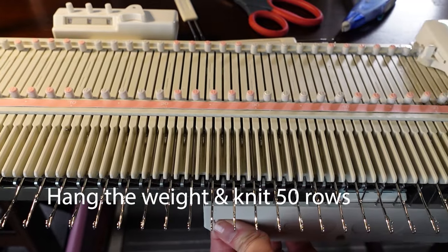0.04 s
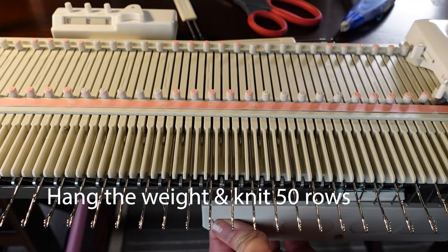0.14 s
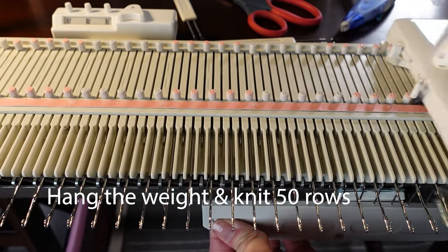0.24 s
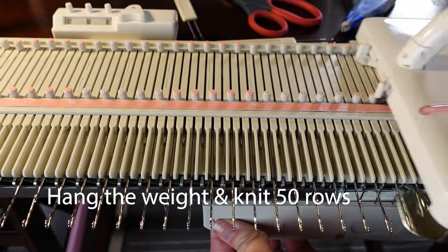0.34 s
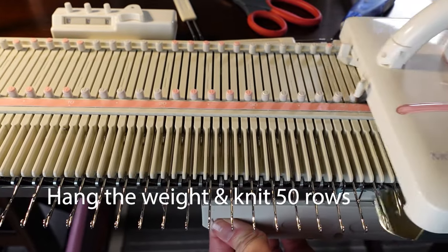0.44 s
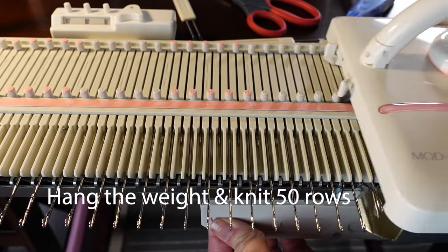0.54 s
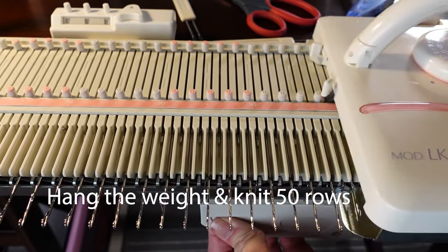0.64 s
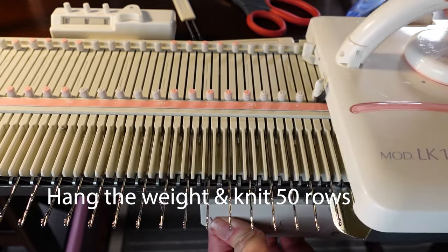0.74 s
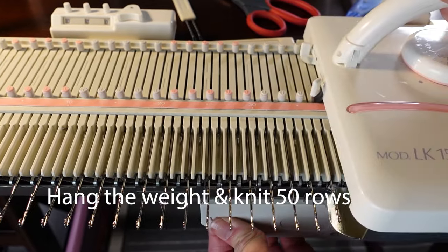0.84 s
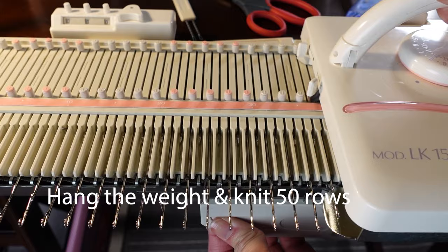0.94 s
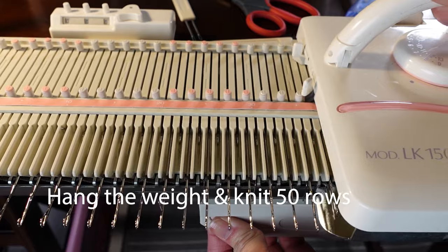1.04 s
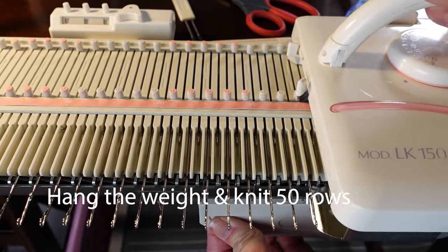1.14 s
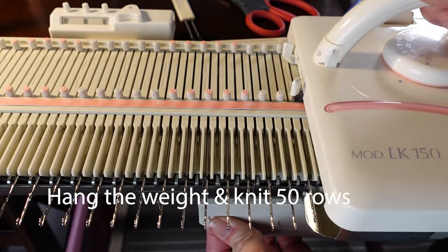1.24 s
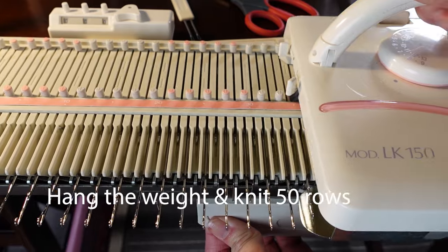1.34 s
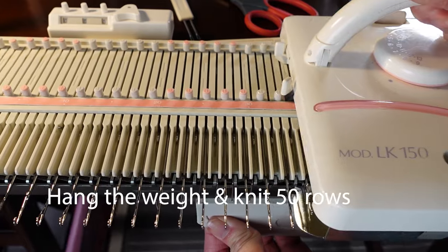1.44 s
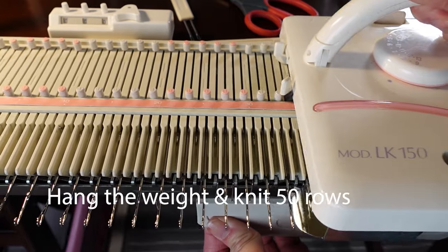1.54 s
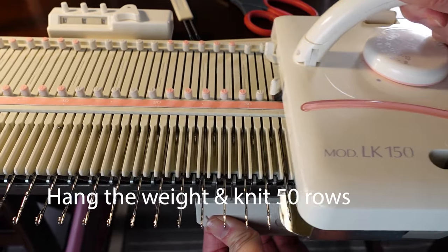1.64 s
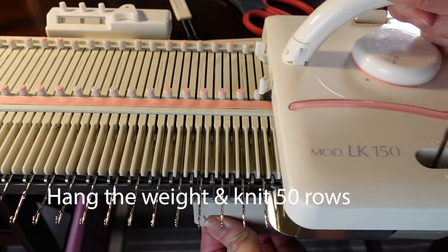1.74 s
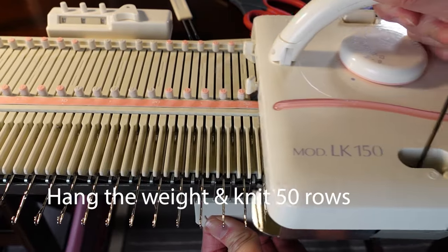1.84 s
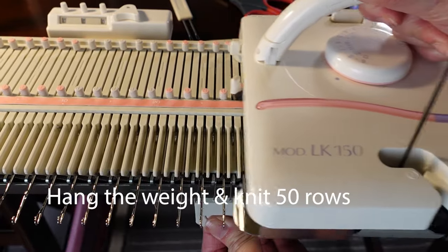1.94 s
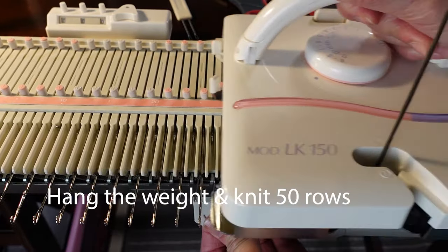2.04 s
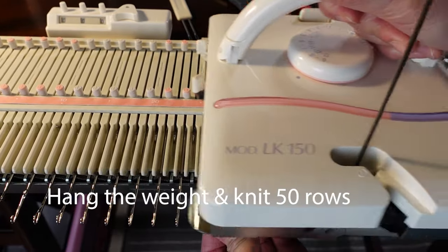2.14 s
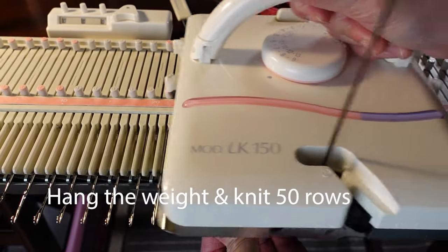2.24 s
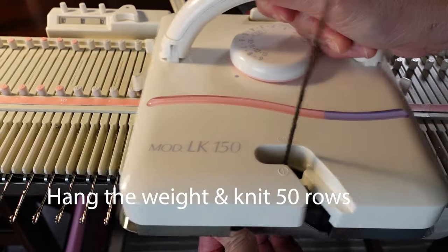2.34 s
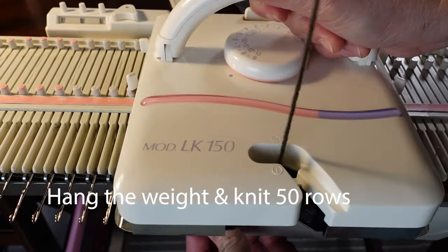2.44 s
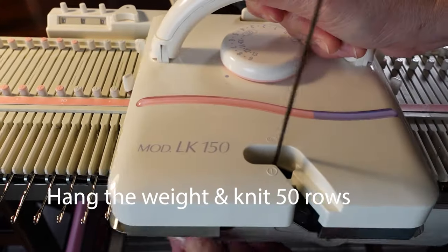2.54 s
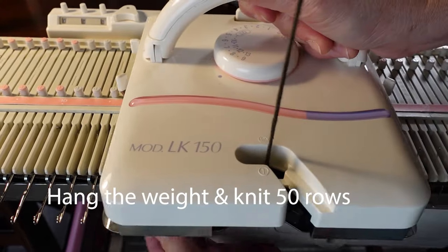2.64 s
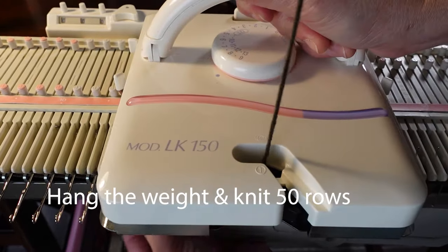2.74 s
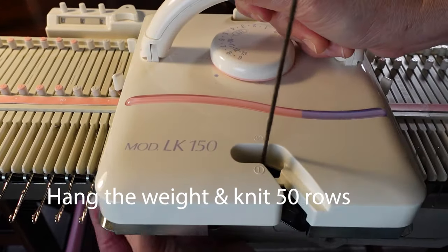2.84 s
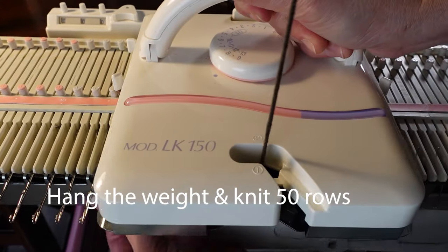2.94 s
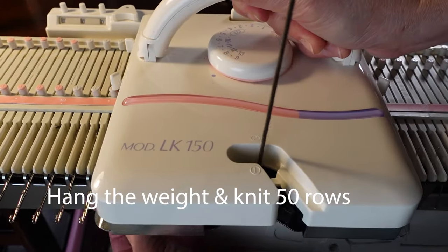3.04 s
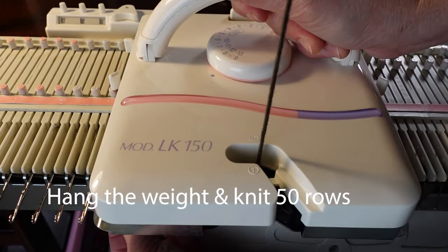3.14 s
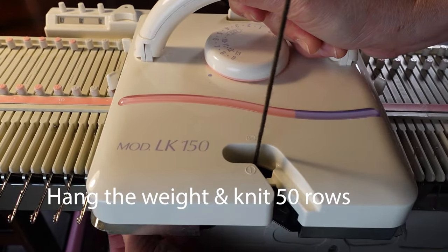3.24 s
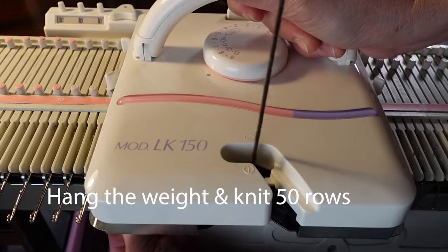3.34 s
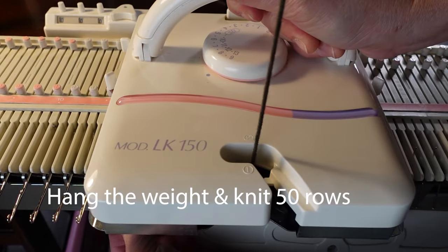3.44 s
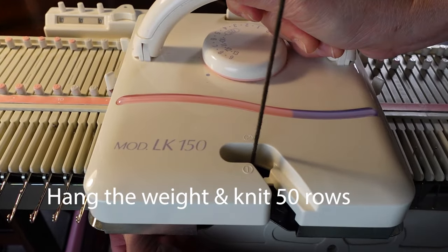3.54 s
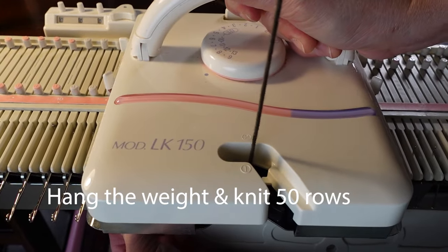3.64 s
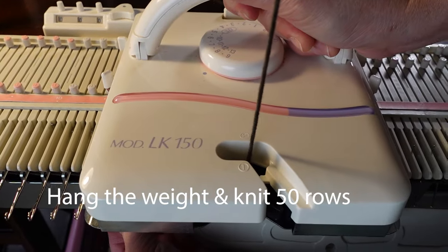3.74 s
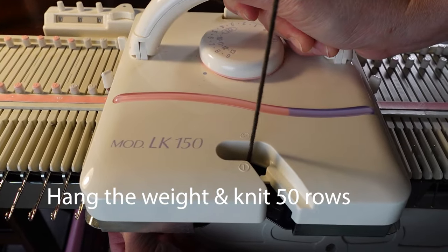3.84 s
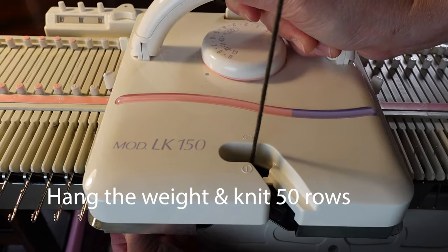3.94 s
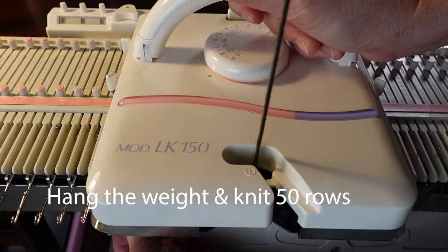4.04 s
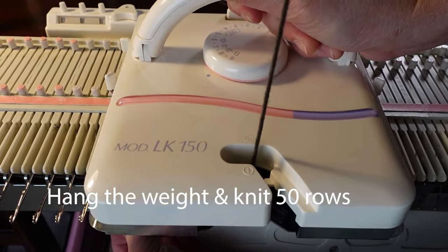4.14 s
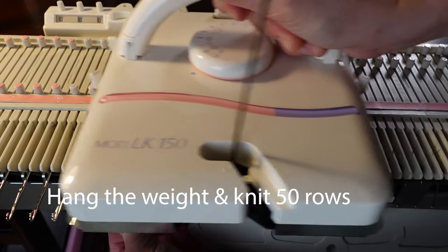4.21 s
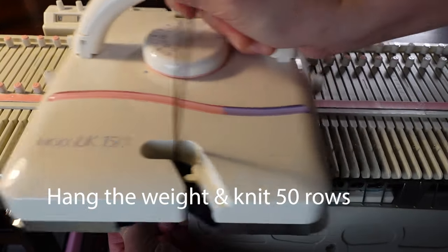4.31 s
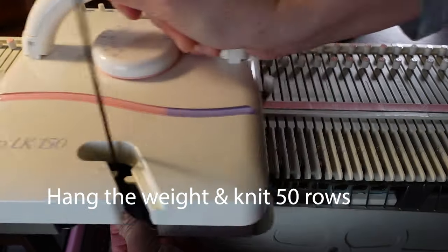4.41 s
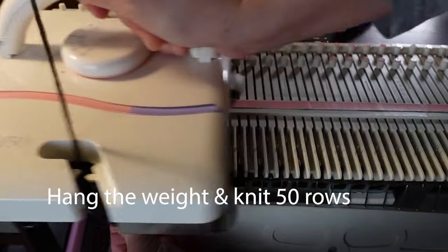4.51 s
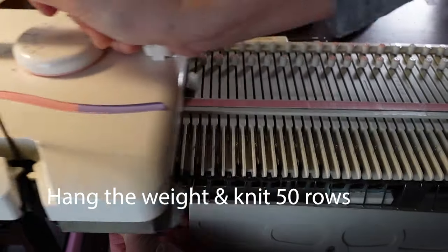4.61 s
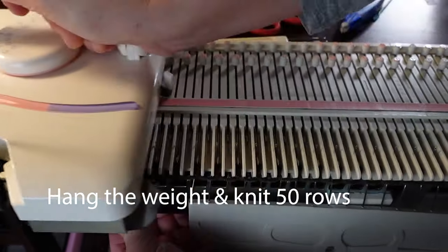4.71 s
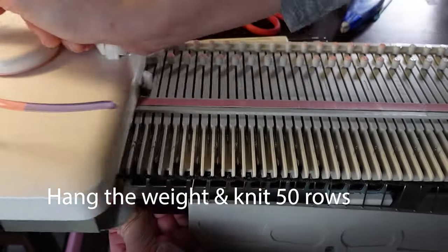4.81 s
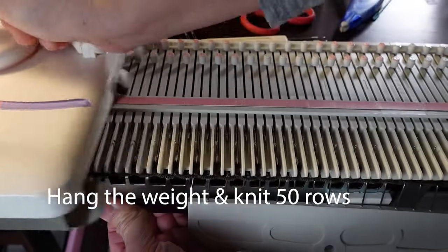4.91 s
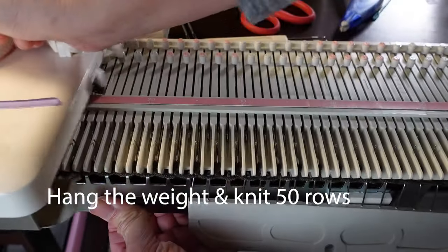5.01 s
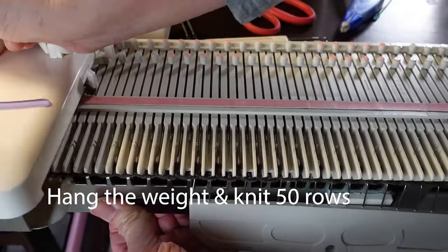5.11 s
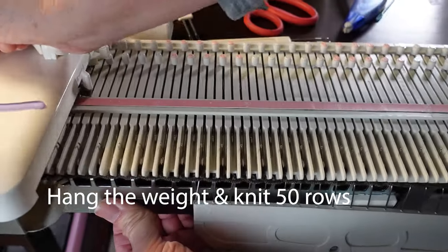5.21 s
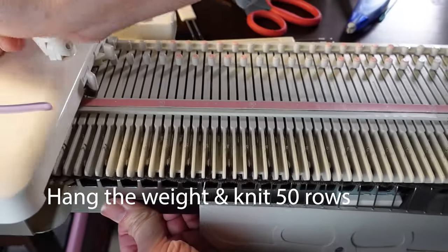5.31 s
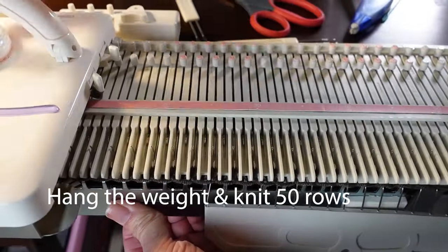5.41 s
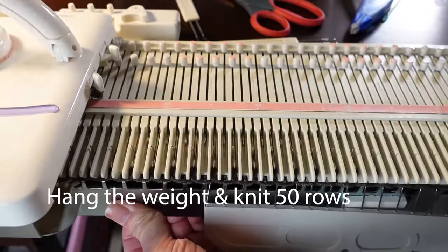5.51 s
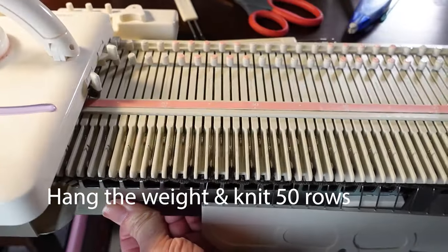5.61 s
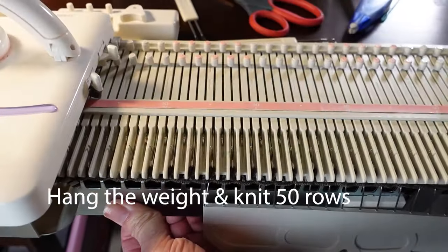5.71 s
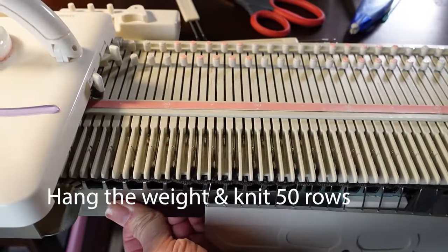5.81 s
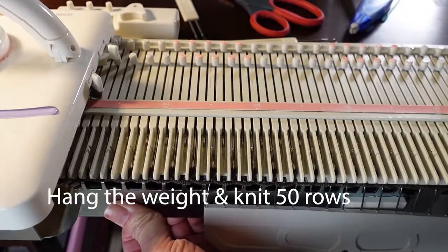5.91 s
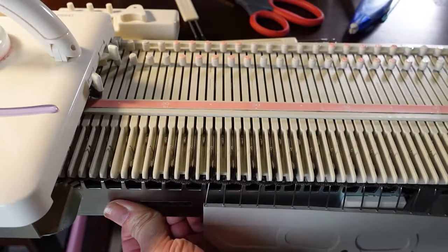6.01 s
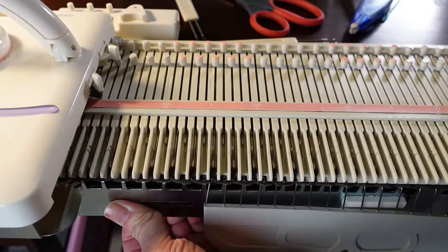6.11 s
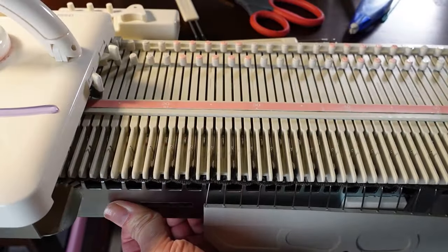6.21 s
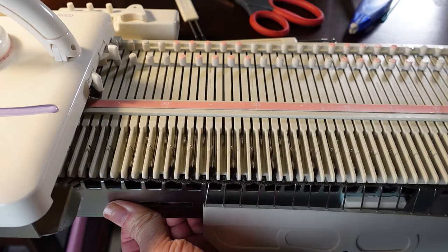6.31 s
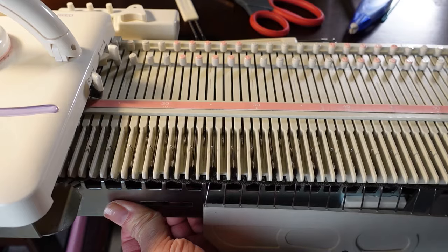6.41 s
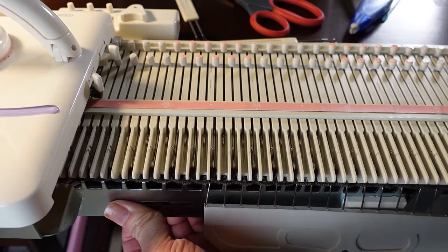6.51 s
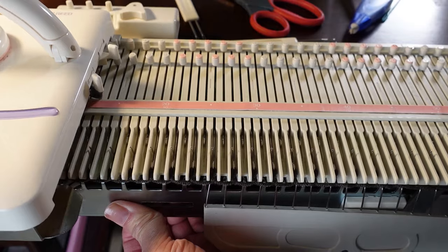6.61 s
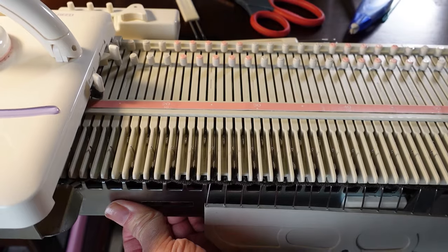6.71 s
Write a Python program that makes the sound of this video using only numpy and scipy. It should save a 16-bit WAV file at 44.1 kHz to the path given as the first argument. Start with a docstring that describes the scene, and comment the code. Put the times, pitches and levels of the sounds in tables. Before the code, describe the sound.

A plastic carriage rattles and clacks in jerky pushes along a needle bed, pauses with faint clicks, rattles hard again, then fingers clink softly on metal.

```python
"""A plastic knitting carriage is pushed in jerks from right to left along the needle bed, close to a phone.
Needle butts clack against its cams: noise bursts that ring shell, rail and table top; steel latches tick.
Runners scrape and rattle: noise shaken by dense tiny knocks; the bed rumbles under each jerk.
At the end a hand clinks and rustles on the steel comb below; a small quiet room adds its tail and faint hiss."""
import sys
import numpy as np
from scipy import signal
from scipy.fft import rfft, irfft
from scipy.io import wavfile

SR = 44100
rng = np.random.default_rng(int(sys.argv[2]) if len(sys.argv) > 2 else 0)


def transcribe(u):
    """Save the signal u as a 16-bit wav file named by the first command-line argument.

    u: samples, shape (n,) or (channels, n), limited to [-1, 1]; the rate is SR.
    q: integer samples, one column per channel.
    """
    v = np.clip(np.atleast_2d(u).T, -1, 1)
    q = np.round(v * 32767).astype(np.int16)
    wavfile.write(sys.argv[1], SR, q)


N = 298116
LEFT_RIGHT = np.array([[1], [-1]])  # sign of the side signal in each channel

# modes of plastic shell and bed: f/Hz, relative level/dB, t60/s
SHELL_MODES = [(691.5, -22.5, 0.076), (1189, -17, 0.019), (1454, -22.5, 0.061), (1630, -27.5, 0.045),
               (2330, -34.5, 0.035), (3100, -15, 0.0094)]


def undb(db):
    """Amplitude ratio of a level in dB."""
    return 10 ** (np.asarray(db) / 20)


def unit(x):
    """Scale x to rms 1."""
    return x / np.sqrt(np.mean(x ** 2))


def pole_radius(t60_s):
    """Factor per sample of a decay of 60 dB in t60_s."""
    return 1000 ** (-1 / (t60_s * SR))


def colour(x, points):
    """Shape the spectrum of x by (f/Hz, level/dB) points, log-f interpolation; rms 1."""
    hz, db = np.transpose(points)
    f_hz = np.fft.rfftfreq(x.shape[-1], 1 / SR) + 1  # +1 avoids log(0)
    gain_db = np.interp(np.log(f_hz), np.log(hz), db, left=-90, right=-90)
    return unit(irfft(rfft(x) * undb(gain_db), x.shape[-1]))


def band(x, hz, q):
    """Two-pole band-pass, gain 1 at the centre."""
    w = 2 * np.pi * min(hz, .45 * SR) / SR
    a = np.sin(w) / (2 * q)
    return signal.lfilter([a, 0, -a], [1 + a, -2 * np.cos(w), 1 - a], x)


def ring(x, modes):
    """Modes of a struck body: two-pole resonators, each of equal energy times its level."""
    out = 0
    for hz, db, t60_s in modes:
        r = pole_radius(t60_s)
        w = 2 * np.pi * hz / SR
        mode = signal.lfilter([1, 0, -1], [1, -2 * r * np.cos(w), r * r], x) / (2 * np.sin(w))
        out = out + undb(db) * np.sqrt(1 - r * r) * mode
    return out


def blows(table, t60_s, rise_s, q, crack_hz, crack_db, spread_db, ring_db, ring_t60_s):
    """A noise burst a row: body around its centre, ring on that pitch, shorter crack; stereo offset varies."""
    length = 4096
    t = np.arange(length) / SR
    shape = 1000 ** (-t / t60_s) * (1 - np.exp(-t / rise_s))
    chance = rng.standard_normal((len(table), length + 1))
    out = np.zeros((2, N + length))
    for (s, db, hz, *_), bright_db, c in zip(table, np.broadcast_to(crack_db, len(table)), chance):
        offset, noise = c[0], c[1:]
        body = band(band(band(noise * shape, hz, q), hz, q), hz, q)
        crack = band(band(noise[::-1] * shape ** 2, crack_hz, 0.52), crack_hz, 0.52)
        tone = ring(noise * shape ** 2, [(hz, 0, ring_t60_s)])
        burst = body / np.abs(body).max()
        burst = burst + undb(ring_db) * tone / np.abs(tone).max()
        burst = burst + undb(bright_db) * crack / np.abs(crack).max()
        # gradient term: a fraction of a sample early in one channel, late in the other
        pair = burst + 0.14 * offset * np.gradient(burst) * LEFT_RIGHT
        i = int(s * SR)
        out[:, i:i + length] += pair * undb(db + spread_db * offset * LEFT_RIGHT / 2)
    return out[:, :N]


def rattle(per_s, scatter_db, t60_s, count=1):
    """Envelopes of dense uneven tiny knocks; `count` parts feel the same knocks, each more or less strongly."""
    own_share, between_knocks_power = 1.2, 0.08
    when = np.flatnonzero(rng.random(N) < per_s / SR)
    size = rng.standard_normal((len(when), 1)) + own_share * rng.standard_normal((len(when), count))
    knocks = np.zeros((count, N))
    knocks[:, when] = undb(scatter_db * np.clip(size.T, -2, 2))
    power = signal.lfilter([1], [1, -pole_radius(t60_s) ** 2], knocks ** 2)
    return np.sqrt(power + between_knocks_power)


def chorus(lo_hz, hi_hz, apart, count, q, **knock):
    """Many loose parts, each rattling on its own pitch; `apart` is side relative to mid."""
    out = 0
    for hz, shake in zip(np.geomspace(lo_hz, hi_hz, count), rattle(count=count, **knock)):
        mid, side = band(shake * rng.standard_normal((2, N)), hz, q)
        out = out + unit(mid) + apart * unit(side) * LEFT_RIGHT
    return out


def moves(start_s, length_s, db, swell_db, rise_s, fade_db_s):
    """Power-summed gain of moves: each rises, swells while it lasts, then fades at a steady dB/s."""
    t = np.arange(0, N, 32) / SR
    age, span = t - start_s[:, None], length_s[:, None]
    swell = swell_db[:, None] * np.clip(age / span, 0, 1)
    shape_db = db[:, None] + swell - fade_db_s * np.maximum(age - span, 0)
    gain = np.clip(age / rise_s, 0, 1) * undb(shape_db)
    return np.interp(np.arange(N) / SR, t, np.sqrt(np.sum(gain ** 2, axis=0)))


def air():
    """Faint room and microphone hiss: steady coloured noise, mostly mid."""
    # hiss spectrum: f/Hz, level per Hz/dB
    hiss_spectrum = [(30, -24), (80, 4), (200, 14.5), (500, 13), (1000, 8.5), (3000, 0.5), (8000, -5),
                     (15500, -8)]
    mid, side = colour(rng.standard_normal((2, N)), hiss_spectrum)
    return undb(-78) * (mid + .3 * side * LEFT_RIGHT)


def room(x):
    """Diffuse noise tail by band; the channels are more alike in the bass than in the treble."""
    # tail bands: f/Hz, t60/s, level/dB
    tail_bands = [(300, 0.36, -16.5), (1230, 0.36, -15), (4000, 0.11, -14), (9900, 0.057, -8.5)]
    t = np.arange(SR // 2) / SR
    tail = 0
    for hz, t60_s, db in tail_bands:
        mid, side = (band(band(rng.standard_normal(len(t)), hz, 0.39), hz, 0.39) for _ in range(2))
        fade = 1000 ** (-t / t60_s) * np.minimum(t / 0.012, 1)
        side_share = np.clip((hz / 54000.0) ** 0.24, 0, 1)
        both = mid + side_share * side * LEFT_RIGHT
        tail = tail + undb(db) * both * fade / np.sqrt(np.sum(fade ** 2))
    return signal.fftconvolve(x[None], tail, axes=1)[:, :N]


def hand():
    """Fingers clink on the steel comb and rustle along comb and yarn; clinks and rustle ring the comb."""
    # finger clinks: t/s, body peak level/dB, f/Hz
    clinks = [(5.6725, -62, 3350), (5.8067, -56, 1250), (5.8296, -61.5, 3730), (5.8631, -54.5, 1290),
              (5.886, -50.5, 3540), (5.9055, -44.5, 3300), (5.9314, -51.5, 1330), (5.9534, -45, 3400),
              (5.9794, -48.5, 2430), (6.0102, -51.5, 2590), (6.0294, -58, 3700), (6.031, -58, 1110),
              (6.0691, -51.5, 3640), (6.0806, -48, 3550), (6.1429, -57, 1250), (6.2123, -55, 2320),
              (6.2244, -59, 2300), (6.3884, -62.5, 3510), (6.5286, -66, 3700), (6.5525, -57, 3600),
              (6.6119, -49, 3900), (6.6244, -50, 3700), (6.6692, -62, 3760), (6.7022, -55.5, 1450),
              (6.722, -56.5, 900), (6.747, -65, 3700)]
    # hand strokes: start t/s, length/s, rustle level/dB, swell/dB, low rustle above rustle/dB
    strokes = [(5.457, 0.091, -86, 5.5, 3), (5.601, 0.063, -89, -11, 17), (5.861, 0.22, -71, 5, -5),
               (6.112, 0.15, -72.5, -3.5, -15), (6.412, 0.032, -70.5, -2.5, -30),
               (6.526, 0.046, -77, 6.5, -21), (6.594, .17, -63, -7, -5.5)]
    # rustle spectrum: f/Hz, level per Hz/dB
    rustle_spectrum = [(800, 5), (1500, -2), (3000, -8), (3750, 4.5), (4500, -5.5), (9000, 0.5),
                       (15500, -2)]
    # comb modes: f/Hz, relative level/dB, t60/s
    comb_modes = [(2460, -23, 0.075), (3700, -14, 0.056), (3820, -16, 0.043), (4200, -14, 0.03)]
    rise_s, fade_db_s = 0.02, 157
    clink = blows(clinks, t60_s=0.054, rise_s=0.00025, q=0.52, crack_hz=7970.0, crack_db=-15.0,
                  spread_db=2.5, ring_db=-9, ring_t60_s=.03)
    start_s, length_s, db, swell_db, low_db = np.transpose(strokes)
    high = chorus(1700.0, 11500.0, apart=0.65, count=5, q=1.55, per_s=1100.0, scatter_db=13.0, t60_s=0.039)
    high = colour(high, rustle_spectrum)
    high = high * moves(start_s, length_s, db, swell_db, rise_s, fade_db_s)
    low = rattle(per_s=401.5, scatter_db=4.0, t60_s=0.061)[0] * rng.standard_normal(N)
    low = unit(band(low, hz=513.0, q=0.42))
    low = low * moves(start_s, length_s, db + low_db, swell_db, rise_s, fade_db_s)
    comb = undb(-8) * ring(clink, comb_modes) + undb(-13) * ring(high, comb_modes)
    return clink + high + low + comb


def slide():
    """Runners scrape through the shell, loose needles jingle, the bed rumbles on a little longer."""
    # carriage jerks: start t/s, length/s, scrape level/dB, swell over the jerk/dB,
    # jingle above scrape/dB, bed rumble level/dB
    jerks = [(-.05, 0.095, -40.5, -8, -3, -59), (0.093, 0.13, -58, 3, -1.5, -78),
             (0.226, 0.19, -45, 8, -2, -67.5), (0.446, 0.31, -43.5, 0, -6, -61.5),
             (0.882, 0.17, -68, 12.5, -1, -85), (1.113, 0.38, -55, -6.5, -7, -69.5),
             (1.571, 0.087, -65.5, 15, -9, -76), (1.651, 0.067, -37, -4.5, -5, -55),
             (1.803, 0.034, -53.5, 7.5, -6, -66), (1.828, 0.093, -41.5, -2, -2.5, -57),
             (1.942, 0.18, -40.5, 2, -6, -57), (2.166, 0.22, -37.5, 4, -5, -53),
             (2.57, 0.07, -46, -4, 0.5, -58.5), (2.734, 0.032, -60, 2, -6, -69),
             (2.838, 0.036, -52, 2.5, -10, -63.5), (2.953, 0.57, -71, -2.5, -6, -68.5),
             (3.577, 0.09, -60.5, 9.5, -8, -73.5), (3.742, 0.084, -62, 6, -13, -68.5),
             (3.979, 0.078, -60.5, -7, -5, -70.5), (4.248, 0.26, -35, 0.5, -3, -50.5),
             (4.528, 0.18, -40.5, 5.5, -0.5, -56), (4.771, 0.047, -45.5, 7.5, -3, -60),
             (4.867, 0.15, -41, 1, -5.5, -53), (5.033, 0.062, -45.5, 8, -5.5, -60),
             (5.159, 0.055, -44, -3, -4, -61), (5.274, 0.18, -54.5, -1.5, -10, -64.5)]
    # scrape spectrum: f/Hz, level per Hz/dB
    scrape_spectrum = [(300, -17.5), (600, -9.5), (850, -6.5), (1190, -0.5), (1700, 2), (2300, 4.5),
                       (3300, 1.5), (4500, -4), (7000, -21)]
    # jingle spectrum: f/Hz, level per Hz/dB
    jingle_spectrum = [(2500, -19), (4000, 5.5), (6500, 4), (10000, 1.5), (13000, -0.5), (15500, 5)]
    # bed rumble spectrum: f/Hz, level per Hz/dB
    rumble_spectrum = [(30, -27.5), (70, -11), (120, -1), (173, 2.5), (250, 4), (450, 6.5), (900, -12.5)]
    rise_s, fade_db_s = 0.021, 258.5
    rumble_rise_s, rumble_fade_db_s = 0.027, 122
    start_s, length_s, db, swell_db, jingle_db, rumble_db = np.transpose(jerks)

    scrape = chorus(698.0, 3600., apart=.13, count=11, q=5., per_s=260., scatter_db=4.0, t60_s=0.036)
    scrape = colour(scrape, scrape_spectrum)
    scrape = scrape + undb(-22.0) * ring(scrape, SHELL_MODES)
    scrape = scrape * moves(start_s, length_s, db, swell_db, rise_s, fade_db_s)

    jingle = chorus(3800., 14000.0, apart=0.37, count=13, q=8.0, per_s=200.0, scatter_db=1.5, t60_s=0.039)
    jingle = colour(jingle, jingle_spectrum)
    jingle = jingle * moves(start_s, length_s, db + jingle_db, swell_db, rise_s, fade_db_s)

    rumble = rattle(per_s=300., scatter_db=3, t60_s=0.05)[0] * rng.standard_normal(N)
    rumble = colour(rumble, rumble_spectrum)
    rumble = rumble * moves(start_s, length_s, rumble_db, swell_db, rumble_rise_s, rumble_fade_db_s)
    return scrape + rumble + jingle


def needles():
    """Clacks ring the shell and, faint and long, the steel rail; latches tick; knocks make the table top hum."""
    # needle butts on the cams: t/s, body peak level/dB, f/Hz, crack relative to body/dB
    clacks = [(0.005, -39.5, 2020, 7), (0.133, -31, 1810, -7), (0.173, -31.5, 2730, -1.5),
              (0.218, -39, 4640, 1.5), (0.238, -28, 4310, -2.5), (0.253, -34.5, 1040, -14),
              (0.264, -25.5, 1960, -5), (0.315, -25, 2900, -19), (0.361, -25.5, 2210, 0),
              (0.392, -27, 3440, -0.5), (0.414, -30, 1770, -5), (0.452, -29.5, 3090, -6),
              (0.474, -37.5, 1220, -0.5), (0.512, -31, 2100, 1), (0.547, -38, 3000, 4),
              (0.57, -27.5, 2900, -12), (0.587, -22.5, 2130, -5), (0.63, -25, 1770, -2),
              (0.667, -27.5, 1880, -2.5), (0.709, -26.5, 1580, -3), (0.809, -42, 3860, -3),
              (0.873, -54, 2100, 6.5), (0.923, -38, 3960, 2), (0.999, -30.5, 3390, -20),
              (1.041, -28.5, 1810, 3.5), (1.063, -29, 2500, -8), (1.067, -25, 2110, -16),
              (1.139, -46.5, 1150, -25.5), (1.152, -34.5, 1600, -25.5), (1.157, -37.5, 1720, -3.5),
              (1.164, -21.5, 2280, -6.5), (1.217, -43, 3000, 5), (1.267, -42, 1660, 4),
              (1.284, -38, 1700, 0.5), (1.313, -31, 3290, -0.5), (1.391, -36.5, 1900, -2.5),
              (1.414, -42.5, 1360, -8), (1.436, -42, 1720, -24), (1.455, -29.5, 2470, -6),
              (1.475, -41, 1350, -10), (1.597, -49, 1300, 3), (1.642, -24, 2410, -8.5),
              (1.698, -36, 2850, 9), (1.727, -32.5, 2700, -10.5), (1.761, -38, 1990, 2.5),
              (1.774, -30, 1640, 2.5), (1.834, -36, 1430, -9.5), (1.903, -31.5, 2940, 4.5),
              (1.955, -33.5, 1870, -4.5), (1.986, -28.5, 2960, -9), (2.005, -30, 1940, -0.5),
              (2.036, -32.5, 1450, -17), (2.06, -33.5, 1900, -2), (2.082, -31.5, 1620, 2),
              (2.135, -30, 1270, -1), (2.164, -30, 1620, -6.5), (2.187, -34, 2260, 4),
              (2.231, -35.5, 3140, 3.5), (2.243, -27, 3020, -3.5), (2.26, -25, 1380, -6.5),
              (2.297, -29, 2430, 2.5), (2.325, -27, 1270, -8), (2.356, -26.5, 1200, 1.5),
              (2.402, -28.5, 1270, -2), (2.578, -26.5, 2090, -12), (2.607, -34, 1510, -5),
              (2.64, -39.5, 1170, 1), (2.75, -41.5, 3000, 0), (2.763, -39.5, 3200, -7),
              (2.819, -42, 3400, -9), (2.834, -45, 1260, -18), (2.854, -41, 3540, -4),
              (2.867, -34, 3530, -20), (2.886, -44.5, 1780, 1), (2.893, -46, 1470, -9),
              (2.903, -47, 3420, -5), (2.923, -43.5, 1250, -25), (2.93, -48, 3460, -3),
              (2.98, -39, 1540, -11), (3.036, -49, 1520, 4), (3.062, -34.5, 1790, -15),
              (3.115, -41, 1310, -3), (3.17, -46, 1260, -45), (3.189, -44, 1590, -38),
              (3.238, -36, 1560, -12), (3.29, -46, 1510, -33), (3.304, -46, 1570, -27),
              (3.318, -47, 1570, -40.5), (3.336, -43, 1540, -8), (3.36, -42.5, 1500, -7),
              (3.381, -46.5, 1680, -25), (3.415, -39.5, 1510, -32), (3.433, -47, 1560, -5),
              (3.442, -44, 1320, -24), (3.454, -46, 1550, -23), (3.464, -46, 1490, -24),
              (3.5, -52, 1420, -20), (3.583, -45, 1320, -7), (3.591, -33.5, 1870, -19),
              (3.597, -36, 1460, 9), (3.653, -32.5, 1650, -22), (3.66, -37, 1340, 4.5),
              (3.678, -34, 2200, 3), (3.701, -39, 1310, -1.5), (3.746, -41, 1310, -3.5),
              (3.756, -29.5, 1920, -21.5), (3.801, -43.5, 1250, -0.5), (3.83, -40.5, 1440, -12),
              (3.847, -41.5, 1180, 0), (3.889, -47.5, 1264, -45), (3.955, -50, 1280, -12),
              (3.991, -47, 1330, -3.5), (4.002, -42.5, 1490, 8), (4.037, -36, 1810, -1.5),
              (4.152, -61, 2500, 5), (4.22, -54.5, 3900, -13.5), (4.25, -29, 1430, -2.5),
              (4.31, -30.5, 1330, 2.5), (4.356, -27, 2220, 1.5), (4.386, -32.5, 1860, 8),
              (4.412, -28, 1020, 7), (4.45, -23.5, 2590, 2), (4.335, -27, 2260, -0.5),
              (4.482, -29.5, 2480, -5.5), (4.505, -29, 1240, -8.5), (4.573, -28.5, 1370, -11),
              (4.6, -32, 1560, 11), (4.615, -25, 1260, 1.5), (4.644, -29, 1300, 11.5),
              (4.658, -27.5, 1550, 4), (4.676, -26, 1510, -3), (4.687, -27, 1500, -6),
              (4.74, -29.5, 2730, 1.5), (4.775, -30.5, 1860, -2.5), (4.802, -39.5, 2420, 3.5),
              (4.826, -32, 1580, 9.5), (4.862, -22.5, 1870, -5), (4.893, -33.5, 2930, -2),
              (4.916, -25, 1570, 7.5), (4.953, -27.5, 1550, 1.5), (4.981, -26.5, 2400, -6),
              (4.994, -24.5, 2610, -8.5), (5.04, -31.5, 1670, -5), (5.068, -51, 2140, 13),
              (5.089, -26.5, 1410, 6.5), (5.144, -31, 3420, -4), (5.169, -35.5, 1690, -13),
              (5.197, -35, 2000, 7), (5.229, -38, 1890, 1), (5.301, -39.5, 1230, -14),
              (5.336, -35.5, 1730, -6), (5.404, -39.5, 1230, -0.5), (5.414, -33.5, 1330, 8),
              (5.445, -28.5, 2220, -14)]
    # steel latches and hooks flipping: t/s, body peak level/dB, f/Hz
    ticks = [(0.1264, -39.5, 6500), (0.169, -37.5, 11750), (0.2422, -30.5, 12000), (0.2785, -35, 5960),
             (0.3115, -28.5, 9700), (0.359, -30, 9540), (0.39, -30, 10700), (0.4369, -39.5, 6240),
             (0.4509, -24.5, 5970), (0.4978, -37, 5860), (0.5704, -29, 6960), (0.622, -33.5, 5550),
             (0.9143, -51, 6660), (1.0005, -32.5, 7170), (1.1199, -50.5, 10700), (1.237, -47.5, 7940),
             (1.2808, -46, 5750), (1.364, -54, 9460), (1.4496, -37, 11100), (1.699, -31.5, 11800),
             (1.7275, -30.5, 7400), (1.871, -28.5, 11800), (1.9025, -36.5, 7060), (1.9739, -38.5, 7000),
             (1.9925, -26, 7170), (2.0282, -29.5, 7030), (2.0938, -26.5, 8900), (2.1995, -29, 10050),
             (2.2283, -30.5, 7460), (2.2725, -25.5, 9600), (2.3326, -27.5, 10000), (2.385, -27, 9400),
             (2.6208, -30, 8320), (2.6828, -56, 7670), (3.2021, -61, 13700), (3.471, -56.5, 6400),
             (3.584, -53, 5950), (3.679, -46, 7800), (3.82, -48, 7000), (4.3817, -28.5, 5260),
             (4.4632, -29.5, 8850), (4.524, -26.5, 8480), (4.581, -29, 9150), (4.6245, -27.5, 9630),
             (4.6664, -27.5, 9600), (4.6728, -25.5, 6400), (4.7186, -30.5, 9550), (4.802, -28, 9000),
             (4.8221, -29, 7250), (4.8623, -30.5, 9600), (4.8938, -26, 8530), (4.9812, -27, 9400),
             (5.002, -27, 6100), (5.0668, -29, 8600), (5.0873, -31, 5850), (5.1783, -43, 8650),
             (5.1931, -33.5, 13000), (5.2838, -49, 6200), (5.3012, -36, 6050), (5.324, -57, 6000),
             (5.334, -46, 6030), (5.349, -43, 5970), (5.398, -47, 5950), (5.414, -35, 8700)]
    # knocks passed on to the table top: t/s, body peak level/dB, f/Hz
    thumps = [(.71, -40, 486), (1.065, -48, 440), (3.43, -62, 95), (4.31, -38.5, 556), (4.42, -41, 524),
              (4.45, -40, 430), (4.61, -41, 557), (4.7, -44.5, 573), (4.77, -43, 640), (4.905, -44, 400),
              (4.915, -47.5, 169), (5.005, -50, 169), (5.085, -49, 173), (5.145, -56, 175),
              (5.21, -50, 313), (5.27, -67, 191), (5.37, -62, 190), (5.43, -61.5, 190), (5.47, -61, 200)]
    # steel rail modes: f/Hz, level/dB, t60/s
    rail_modes = [(2740, -43, 0.5), (3085, -43, 0.6), (3801, -39, 0.8)]
    # table-top modes: f/Hz, level/dB, t60/s
    table_modes = [(173, -52, 0.16), (198, -53, 0.24)]
    clack = blows(clacks, t60_s=0.041, rise_s=0.000092, q=0.54, crack_hz=6230.0,
                  crack_db=np.transpose(clacks)[3], spread_db=2.5, ring_db=-8, ring_t60_s=.018)
    tick = blows(ticks, t60_s=0.019, rise_s=0.0001, q=0.84, crack_hz=9600.0, crack_db=1.0,
                 spread_db=-3.0, ring_db=-2, ring_t60_s=.013)
    thump = blows(thumps, t60_s=0.04, rise_s=.004, q=1.1, crack_hz=500., crack_db=-22,
                  spread_db=.5, ring_db=-12, ring_t60_s=.04)
    shell = undb(-18.0) * ring(clack, SHELL_MODES)
    return clack + shell + ring(clack, rail_modes) + tick + thump + ring(thump, table_modes)


def scene():
    """Carriage and hand, panned along the bed, plus room tail and hiss."""
    # carriage position: t/s, left minus right/dB
    place = [(0, -2.5), (1.5, -1.5), (2.5, 0), (4.2, 0), (5, 0.55), (5.6, 4), (6.77, 4)]
    place_s, place_db = np.transpose(place)
    pan_db = np.interp(np.arange(N) / SR, place_s, place_db)
    machine = needles() + slide() + hand()
    panned = machine * undb(LEFT_RIGHT * pan_db / 2)
    return panned + room(machine.mean(axis=0)) + air()


def record(dry):
    """The phone cuts the top: steep elliptic low-pass."""
    top_hz = 15900
    sos = signal.ellip(10, .2, 70, top_hz, fs=SR, output="sos")
    return signal.sosfilt(sos, dry)


dry = scene()
out = record(dry)
transcribe(out)
```